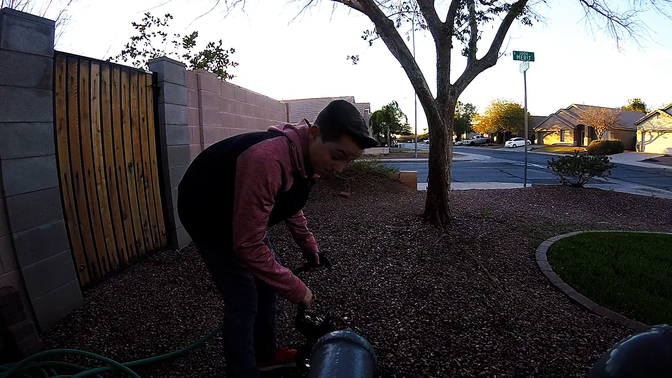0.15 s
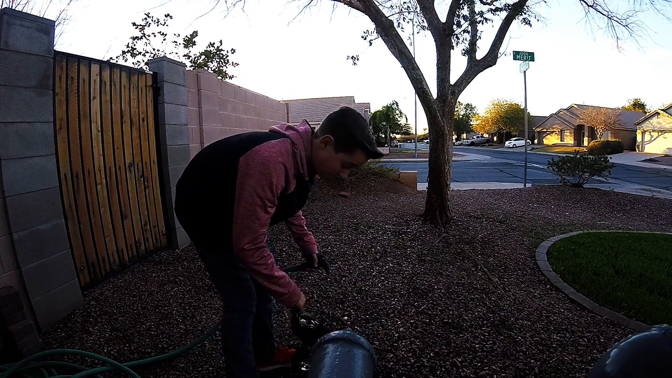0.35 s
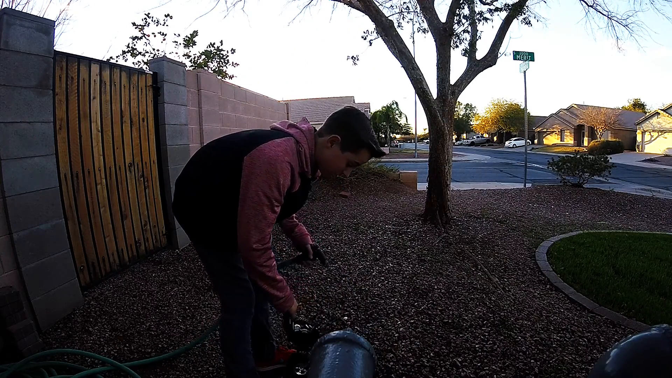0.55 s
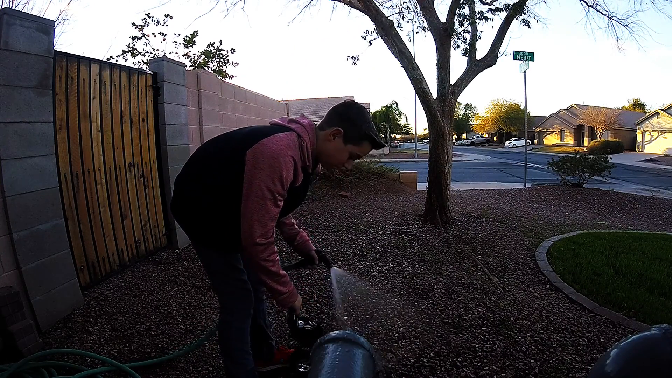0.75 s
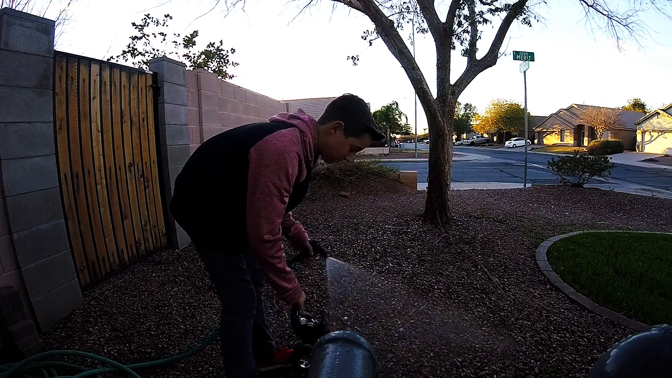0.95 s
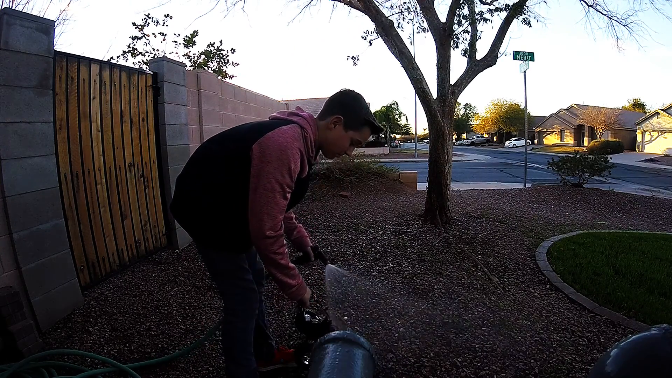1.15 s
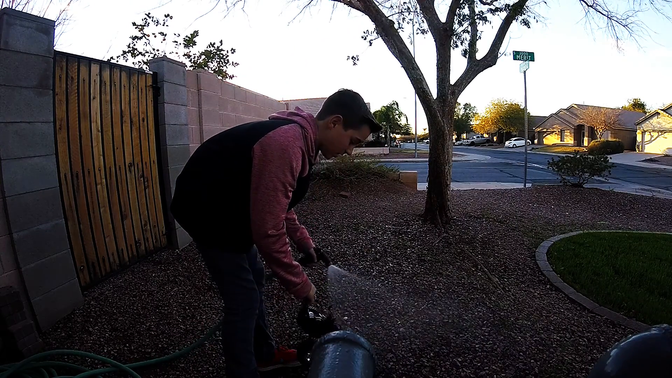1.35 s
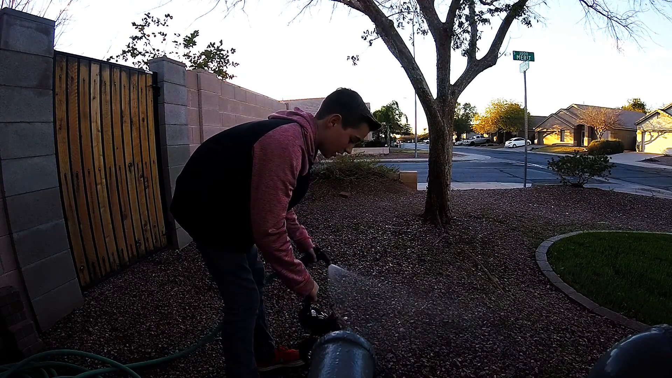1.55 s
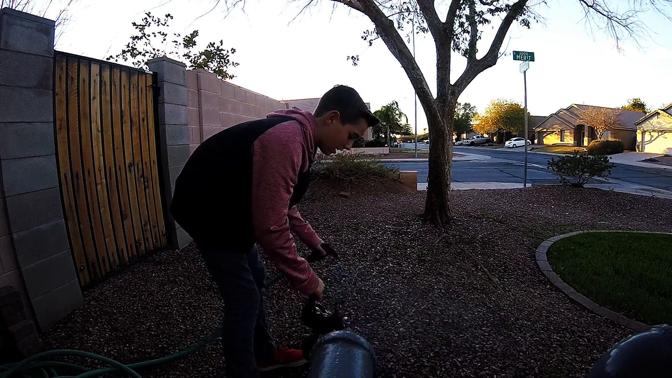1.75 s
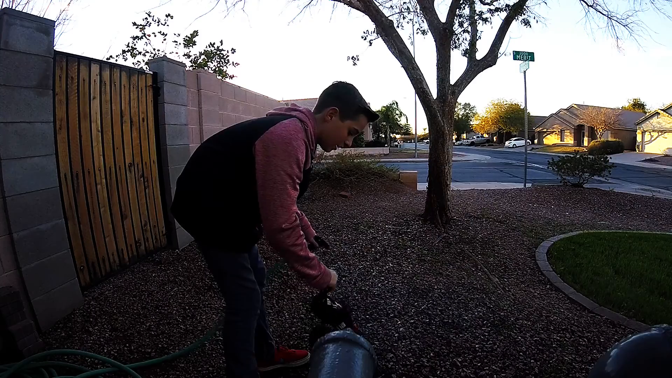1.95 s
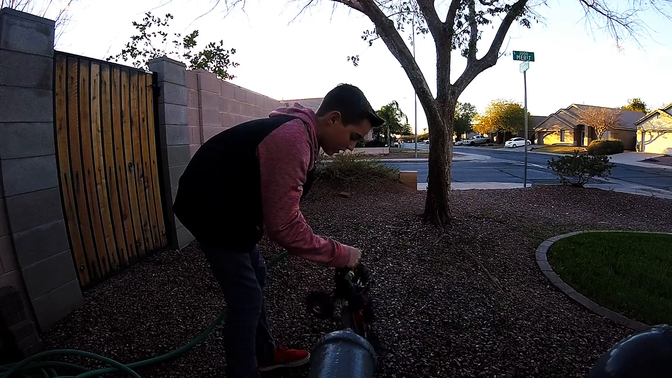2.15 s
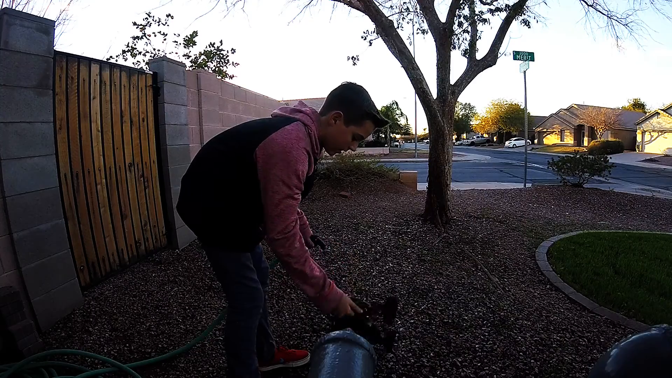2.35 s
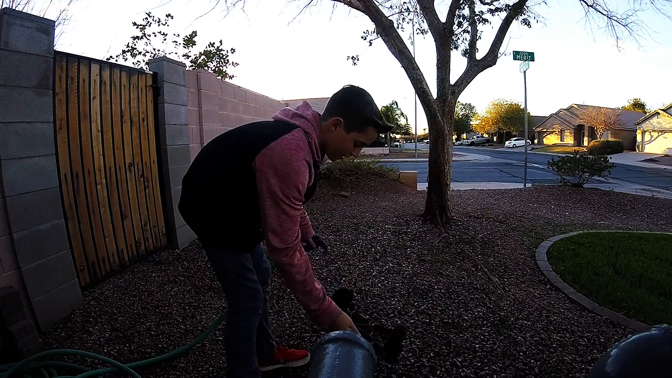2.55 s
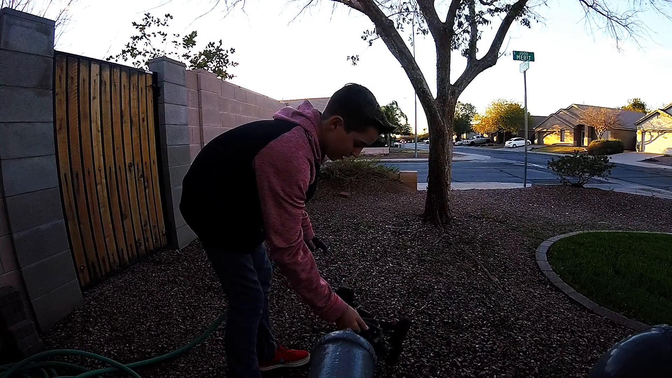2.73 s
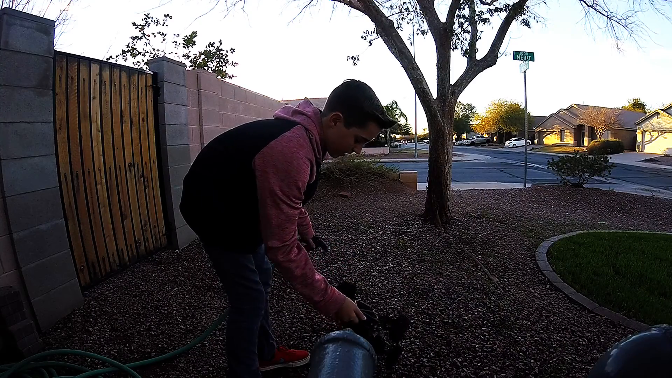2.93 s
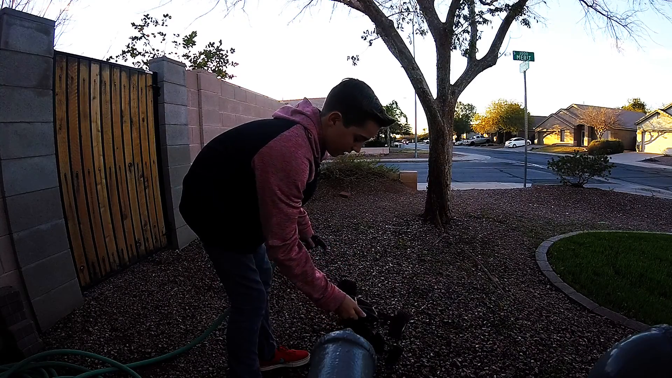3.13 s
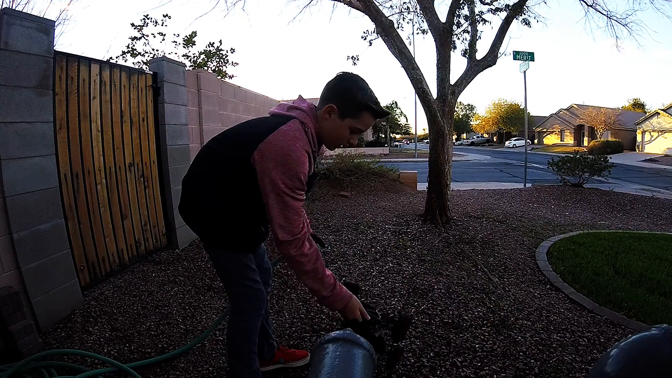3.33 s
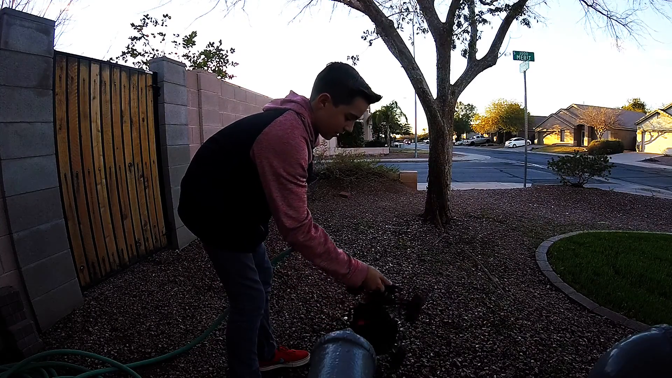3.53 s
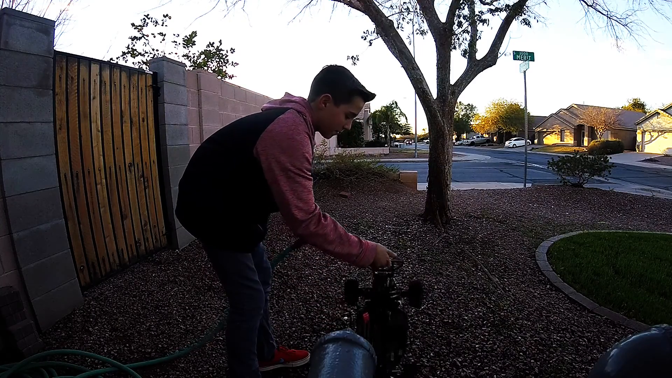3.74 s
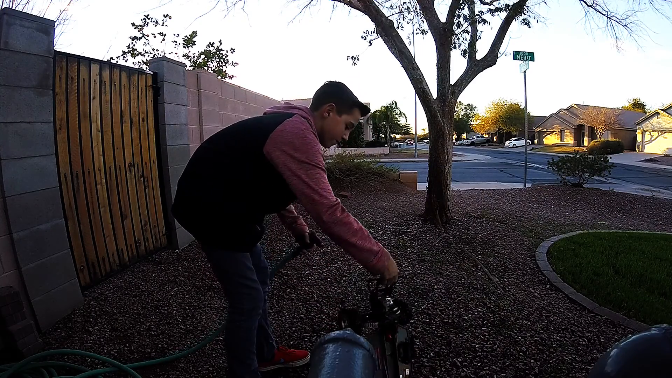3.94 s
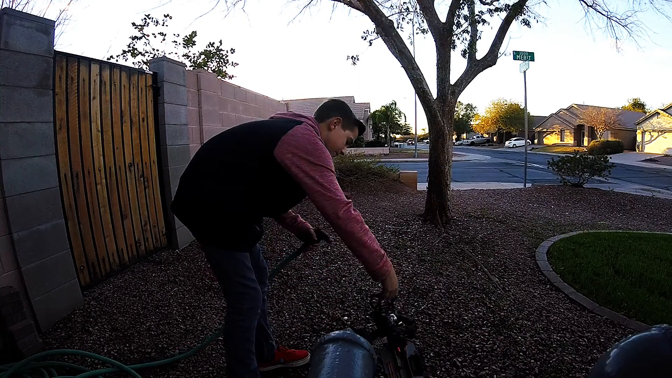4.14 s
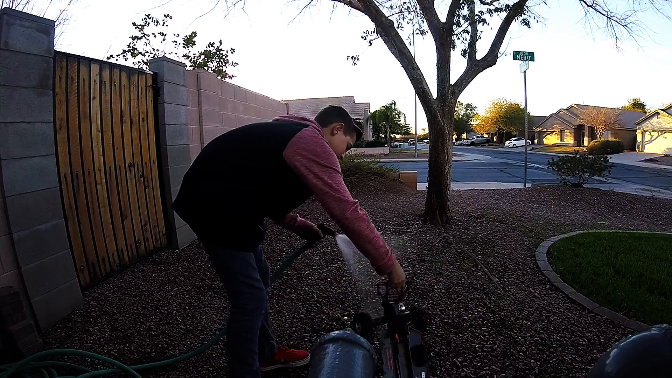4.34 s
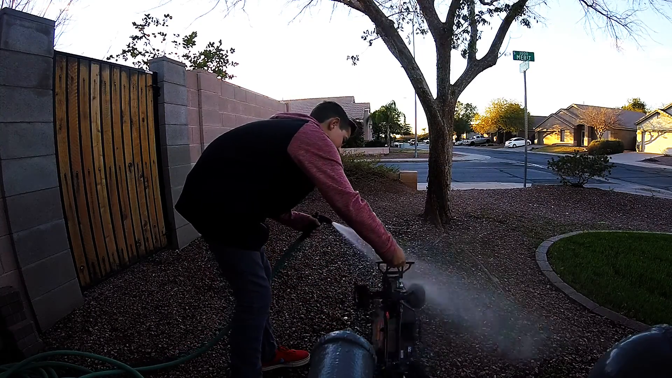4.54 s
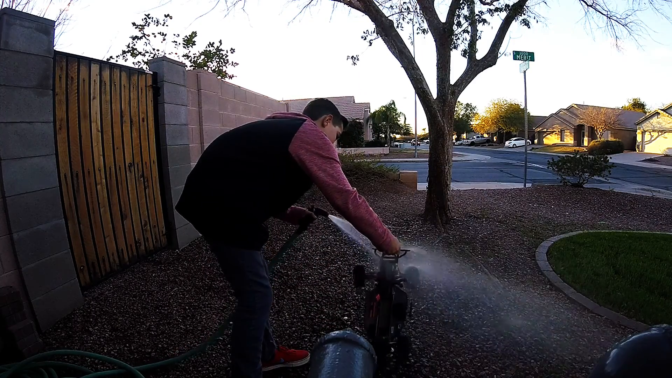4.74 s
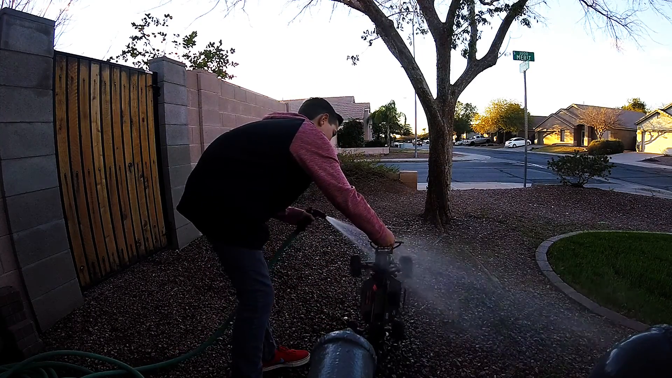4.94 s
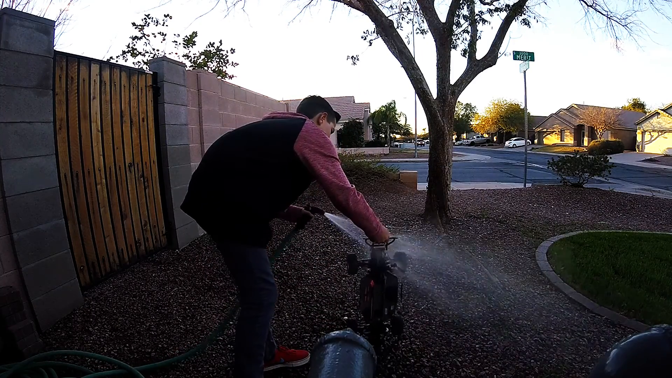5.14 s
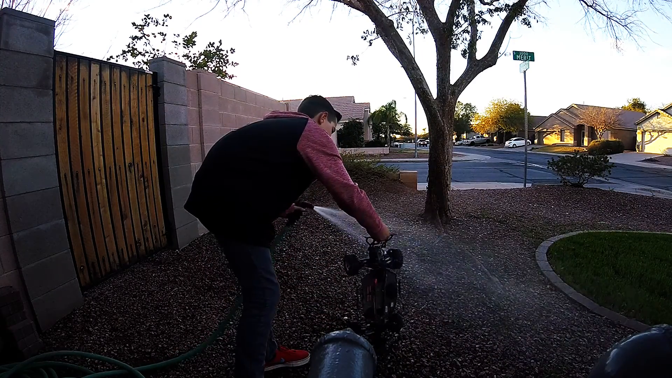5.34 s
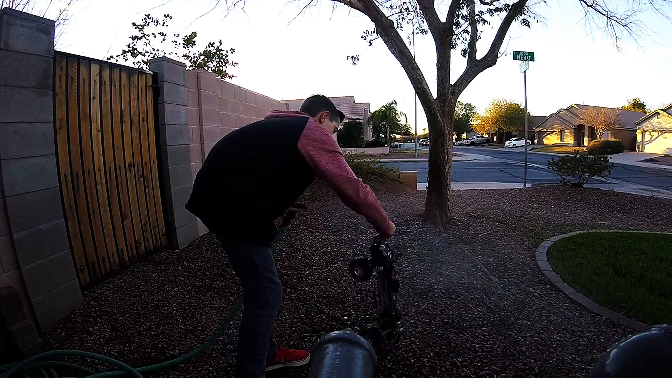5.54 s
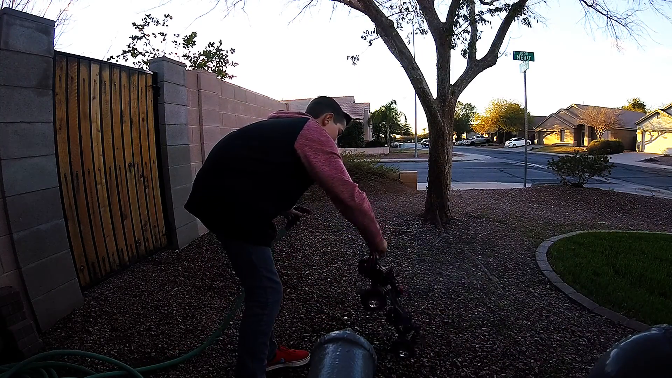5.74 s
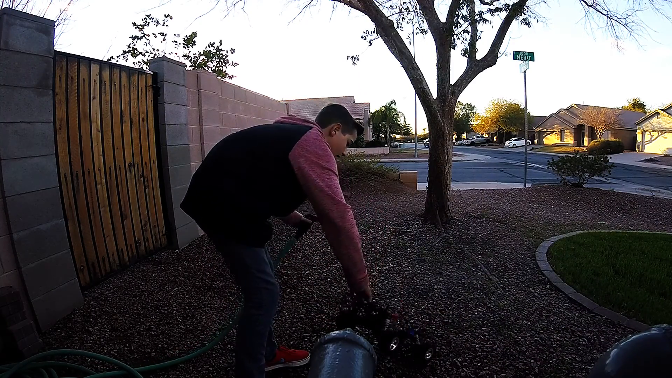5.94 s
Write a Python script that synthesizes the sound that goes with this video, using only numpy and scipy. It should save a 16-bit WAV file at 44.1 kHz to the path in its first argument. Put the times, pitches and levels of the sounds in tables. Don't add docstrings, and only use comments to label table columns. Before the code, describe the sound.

A dirt bike howls at full throttle and coasts away while a garden hose sprays gravel, then drums on a hollow plastic model car.

```python
import sys
import numpy as np
from scipy import signal
from scipy.fft import rfft, irfft, next_fast_len
from scipy.io import wavfile
from scipy.ndimage import uniform_filter1d, map_coordinates

SR = 44100
rng = np.random.default_rng(int(sys.argv[2]) if len(sys.argv) > 2 else 0)


def volts_from_decibels(level):
    exponent = np.asarray(level, float) / 20
    return 10 ** exponent


def wav_out(sig):
    wavfile.write(sys.argv[1], SR, np.round(np.clip(np.atleast_2d(sig).T, -1, 1) * 32767).astype(np.int16))


N = 268216


def unit(x):
    return x / np.sqrt(np.mean(x ** 2) + 1e-20)


def curve(rows):
    s, value = np.transpose(rows)
    return np.interp(np.arange(N) / SR, s, value)


def ramp(start, length):
    return np.clip((np.arange(N) / SR - start) / length, 0, 1)


def humps(rows):
    t = np.arange(N) / SR
    return sum(volts_from_decibels(db) * np.cos(np.pi * np.clip((t - s) / length, -.5, .5)) for s, db, length in rows)


def wobble(rate):
    knots = rng.standard_normal(int(N * rate / SR) + 4)
    return map_coordinates(knots, [np.arange(N) * rate / SR])


def filtered(x, response):
    m = next_fast_len(N + SR // 2)
    return irfft(rfft(x, m) * response(np.fft.rfftfreq(m, 1 / SR)), m)[:N]


def colour(points):
    f, db = np.transpose(points)
    return lambda hz: volts_from_decibels(np.interp(np.log(hz + 1), np.log(f + 1), db, left=-120, right=-120))


def modes(peaks):
    def response(f):
        total = 0
        for k, (centre, width, db) in enumerate(peaks):
            damping = 1j * f * width
            total = total + (-1) ** k * volts_from_decibels(db) * damping / (centre * centre - f * f + damping)
        return total
    return response


def rush(patchy_db):
    z = signal.stft(rng.standard_normal(N), nperseg=512)[2]
    field = uniform_filter1d(rng.standard_normal(z.shape), size=6, axis=0)
    field = uniform_filter1d(field, size=8, axis=1)
    return unit(signal.istft(z * volts_from_decibels(patchy_db * unit(field)), nperseg=512)[1][:N])


def drops(per_second, spread_db):
    hit = rng.random(N) < per_second / SR
    size_db = spread_db * np.minimum(rng.exponential(size=N), 2)
    return unit(hit * rng.choice([-1, 1], N) * volts_from_decibels(size_db))


def fading_tone(turns, depth, rate):
    reflections = depth * (wobble(rate) + 1j * wobble(rate))
    return np.imag((1 + reflections) * np.exp(2j * np.pi * turns))


def soft(x):
    return filtered(x, lambda hz: 1 / (1 + 1j * hz / 13000) ** 2 / (1 + (hz / 11200) ** 12))


# pitch_hz, level_db [per Hz]
ROAD_COLOUR = [(230, 11), (280, 1.5), (340, 5), (420, 3), (480, -2), (560, -8.5)]
# peak_s, peak_db, length_s
LORRIES = [
    (2.2, -48, 0.8),
    (3, -44.5, 0.91),
    (4.9, -61, 1.2),
    (6.2, -47, 2.4),
]
# start_s, end_s, first_hz, last_hz, level_db
DRONES = [(0.64, 1.46, 210, 140, -31), (1.3, 1.53, 169, 172, -31), (2.05, 2.93, 177.1, 150, -43),
          (2.8, 3.97, 140.2, 149, -42.5), (4.2, 7, 149, 140, -46), (3.95, 5.1, 150, 240, -37),
          (4.2, 4.9, 260.7, 280.5, -45.5), (4.7, 8.5, 200, 180, -37.5), (1.6, 2.8, 683, 690, -52.5),
          (2.5, 2.9, 404.6, 390, -46), (2.8, 3.3, 350, 330, -50.5), (5.4, 6.36, 690, 700, -48.5)]


def traffic():
    out = (volts_from_decibels(-52) + humps(LORRIES)) * unit(filtered(rush(1.1), colour(ROAD_COLOUR)))
    for start, end, first_hz, last_hz, db in DRONES:
        turns = np.cumsum(first_hz + (last_hz - first_hz) * ramp(start, end - start)) / SR
        swell = humps([((start + end) / 2, db, end - start)])
        out += swell * fading_tone(turns, .35 + first_hz / 900, 8 + first_hz / 14)
    return out


# pitch_hz, level_db [per Hz]
BOOM_COLOUR = [(62, -69), (105, -33), (127, -27.5), (145, 1.5), (248, -6), (273, -22), (291, -14),
               (327, -73), (420, -21.5), (550, -19), (920, -120)]
# pitch_hz, level_db [per Hz]
WASH_COLOUR = [(180, -14), (300, -2), (367, -5), (541, -12.5), (684, 0.5), (800, -3.5), (988, -1.5),
               (1180, -5.5), (1410, -0.5), (2020, -12), (2280, -12), (2460, -13.5), (4300, -27.5),
               (5590, -62), (9460, -120)]
# peak_s, peak_db, length_s
CROSSING_CARS = [
    (2.25, -45.5, 1.6),
    (3.2, -58, 0.17),
    (6.2, -40, 1.27),
]


def street_air():
    bike_near = volts_from_decibels(-20 * np.maximum(np.arange(N) / SR - 0.83, 0) / 0.98)
    boom = unit(filtered(rush(1.0), colour(BOOM_COLOUR)))
    wash = unit(filtered(rush(1.4), colour(WASH_COLOUR)))
    boom_gain = np.hypot(volts_from_decibels(-36.5 + .9 * wobble(2.5)), volts_from_decibels(-35.5) * bike_near)
    wash_gain = np.hypot(volts_from_decibels(-42 + 0.21 * wobble(3.0)), volts_from_decibels(-39.5) * bike_near + humps(CROSSING_CARS))
    return boom_gain * boom + wash_gain * wash


# pitch_hz, level_db [per Hz]
BUFFET_COLOUR = [(12, -30), (20, -14), (75, -7), (115, -8.5), (150, 7.5), (250, -120)]
# peak_s, peak_db, length_s
GUSTS = [
    (.15, -35, 0.65),
    (1.3, -54, 2),
    (4.1, -56, 0.86),
    (4.85, -41, 0.96),
    (5.6, -45.5, 1.3),
]


def wind():
    buffet = unit(volts_from_decibels(0.9 * wobble(5.8)) * filtered(rush(0.17), colour(BUFFET_COLOUR)))
    calm, gust = volts_from_decibels(-59), humps(GUSTS)
    return (calm + gust ** 2 / (gust + calm)) * buffet


# pitch_hz, level_db [per Hz]
LEAK_COLOUR = [(2240, -18), (3800, -8.5), (4120, -11.5), (4780, -2), (5490, 4), (5890, 3.5), (6680, -1),
               (7240, 2.5), (7500, 0), (8910, -4.5), (10500, 0), (11600, -11.5), (15400, -14.5)]
# pitch_hz, width_hz, level_db
LEAK_TONES = [(6540, 41, 13), (6830, 34, 4), (7780, 170, 4.5), (9030, 110, 3), (9850, 47, 7),
              (10300, 31, -11)]
# time_s, level_db
NOZZLE = [
    (0, -44),
    (1.6, -47.5),
    (1.78, -47.5),
    (3.1, -47),
    (3.8, -44.5),
    (4.4, -47),
    (5.5, -47),
    (5.56, -52.5),
    (6.08, -47.5),
]


def nozzle_leak():
    hiss = unit(filtered(rush(1.7) + 0.6 * drops(900, 3.5), colour(LEAK_COLOUR)))
    whistle = unit(filtered(rush(3.5), modes(LEAK_TONES)))
    return volts_from_decibels(curve(NOZZLE) + 0.62 * wobble(13)) * (hiss + 0.51 * whistle)


# start_s, peak_db, pitch_hz
TICKS = [(1.834, -22.5, 10300), (2.0209, -23, 5900), (2.165, -22, 5207), (2.3237, -22, 5050),
         (2.451, -23, 6490), (2.4632, -22, 5155), (2.48, -18, 5750), (2.5064, -17, 5500),
         (2.517, -17, 5400), (2.524, -18, 5600), (2.577, -25, 5470), (2.5965, -31, 4940),
         (2.617, -19, 5640), (2.6371, -20, 5520), (2.6643, -22, 5400), (2.781, -22.5, 7780),
         (2.837, -21, 6400), (3.0233, -33, 5260), (3.068, -31, 6500), (3.0971, -28, 5320),
         (3.1115, -12.5, 5350), (3.113, -19, 4040), (3.12, -19, 5460), (3.15, -31, 5200),
         (3.471, -15, 6640), (3.5047, -24, 6830), (3.5503, -22, 5330), (3.556, -23, 5300),
         (3.6346, -16.5, 5560), (3.66, -21, 5470), (3.682, -20, 6040), (3.62, -25, 5340), (3.72, -28, 6300),
         (3.738, -21, 5870), (3.7477, -16, 6000), (3.76, -24, 5600), (3.768, -21, 5400),
         (4.109, -21.5, 5600), (4.4035, -15, 5660), (4.6234, -29, 5100), (4.6558, -18, 5450),
         (4.7411, -18, 5100), (4.755, -14, 5070), (4.8324, -26, 5270), (4.859, -14, 5300),
         (4.867, -12, 5270), (4.9401, -22, 5400), (4.965, -16, 5500), (4.998, -25, 5000),
         (5.029, -22, 5600), (5.053, -11, 5000), (5.06, -13, 4850), (5.064, -14, 5530), (5.075, -21, 4820),
         (5.27, -21, 5160), (5.503, -17, 5060), (5.41, -28, 5400), (5.467, -25, 6540), (5.707, -34, 5000),
         (5.7335, -25.5, 8000), (5.998, -23, 5190), (6.0493, -25, 5160),
         (2.212, -28, 7300),
    (2.2304, -24, 5000),
    (2.3096, -27, 3020),
    (5.5446, -27, 5390),
    (5.6461, -35, 7090),
    (5.7594, -31, 5530),
    (5.983, -31, 3020),
    (6.0137, -25.5, 5800),
    (6.0703, -24, 5190),
]


def ticks():
    crack, ring = np.zeros(N + SR), np.zeros(N + SR)
    t = np.arange(SR // 50) / SR
    for s, db, hz in TICKS:
        i = round(s * SR)
        crack[i:][:len(t)] += volts_from_decibels(db - 8.5 - 60 * t / 0.022) * rng.standard_normal(len(t))
        onset = 1 - np.exp(-t / 0.00012)
        ring[i:][:len(t)] += volts_from_decibels(db - 11.5 - 60 * t / 0.018) * onset * np.sin(2 * np.pi * hz * t)
    crack_colour = lambda hz: colour(LEAK_COLOUR)(hz) / (1 + (hz / 11500) ** 8)
    return filtered(crack[:N], crack_colour) + ring[:N]


def contacts(rows):
    force, clack, hollow = np.zeros(N + SR), np.zeros(N + SR), np.zeros(N + SR)
    clack_hz, hollow_hz, pitch_spread = 1740, 928, 0.054
    t = np.arange(SR // 20) / SR
    ring = volts_from_decibels(8.5 - 60 * t / 0.023) * (1 - np.exp(-t / 0.0025))
    for s, db, hollow_db in rows:
        i = round(s * SR)
        burst = volts_from_decibels(-60 * t / 0.015) * (1 - np.exp(-t / 0.0016)) * rng.standard_normal(len(t))
        burst[0] = 1.6
        high, low = 1 + pitch_spread * rng.uniform(-1.25, 1, size=2)
        force[i:][:len(t)] += volts_from_decibels(db + 25) * burst
        clack[i:][:len(t)] += volts_from_decibels(db) * ring * np.sin(2 * np.pi * clack_hz * high * t)
        hollow[i:][:len(t)] += volts_from_decibels(hollow_db) * ring * np.sin(2 * np.pi * hollow_hz * low * t)
    return force[:N], clack[:N], hollow[:N]


# peak_s, level_db, build_up_s
SCRAPES = [
    (2.53, -43, 0.082),
    (2.645, -43.5, 0.088),
    (2.74, -44.5, 0.36),
    (3.032, -47, 0.028),
    (3.111, -40, 0.024),
    (3.44, -50, 0.067),
    (3.55, -48.5, 0.11),
    (3.632, -39, 0.077),
    (3.68, -44, 0.24),
]
# pitch_hz, width_hz, level_db
CHASSIS = [(897, 63, 7), (1753, 110, 5), (1910, 75, -0.5), (2385, 86, -0.5), (3500, 630, -23),
           (5140, 230, -3.5), (5400, 210, -18), (6340, 240, -12), (7400, 720, -28)]
# start_s, clack_db, hollow_db
KNOCKS = [(2.445, -42, -48), (2.4631, -35, -37), (2.48, -36, -29), (2.5069, -33, -28), (2.514, -40, -36),
          (2.52, -34, -33), (2.5248, -43, -30), (2.6144, -38, -46), (2.622, -28.5, -28), (2.637, -34, -44),
          (2.647, -49, -43), (2.6633, -31.5, -37), (2.682, -35, -42), (2.696, -55, -40), (2.711, -35, -40),
          (2.718, -34, -34), (2.738, -53, -35), (3.0232, -37.5, -46), (3.097, -39, -40),
          (3.104, -37.5, -37), (3.1121, -48, -23.5), (3.1512, -45, -43), (3.39, -43, -55),
          (3.435, -38, -42), (3.5352, -39, -34), (3.579, -41, -52), (3.599, -53, -34), (3.611, -34, -48),
          (3.617, -42, -46), (3.6214, -33, -44), (3.6322, -30.5, -34), (3.64, -32, -41),
          (3.6612, -35.5, -42), (3.673, -40, -32), (3.682, -48, -48)]
# start_s, panel_db, hollow_db
SLAPS = [(4.4598, -30, -32), (4.5477, -33, -48), (4.649, -30, -55), (4.687, -30.5, -29),
         (4.719, -28.5, -23), (4.8335, -23, -22), (4.8669, -29.5, -23), (4.8749, -26, -40),
         (4.896, -29, -20.5), (4.965, -27, -40), (4.998, -34, -33), (5.01, -34, -33), (5.052, -34, -37),
         (5.061, -40, -41), (5.075, -35, -36), (5.2457, -34, -30), (5.27, -34, -42)]


def scrapes():
    grit = 0.66 * rush(3.0) + 0.59 * drops(900, 1.7)
    body = unit(filtered(grit, modes(CHASSIS)))
    hiss = 0.62 * unit(filtered(grit, colour(JET_COLOUR)))
    crunch = 0.22 * unit(filtered(grit, colour(SPLASH_COLOUR)))
    drags = []
    for s, db, rise in SCRAPES:
        build = volts_from_decibels(db - 21 * (1 - ramp(s - rise, rise))) * ramp(s - rise, rise / 10)
        drags.append(build * (1 - ramp(s, 0.035)) ** 2)
    jolts = volts_from_decibels(2 * wobble(60))
    return volts_from_decibels(4.5) * np.max(drags, axis=0) * (body + hiss + crunch) * jolts


def car():
    force, clack, hollow = contacts(KNOCKS)
    slap, _, drum = contacts(SLAPS)
    impact = force + slap
    rasp = volts_from_decibels(-9.5) * filtered(impact, colour(SPLASH_COLOUR)) + volts_from_decibels(-24) * filtered(impact, colour(LEAK_COLOUR))
    knock = filtered(force, modes(CHASSIS[2:])) + clack + hollow
    slapped = volts_from_decibels(-1) * filtered(slap, modes(SHELL[1:])) + drum
    return volts_from_decibels(1.0) * soft(scrapes() + rasp + knock + slapped)


# open_s, shut_s, jet_db, surge_db, splash_db [over the jet]
SPRAYS = [
    (0.765, 1.74, -37, 6.5, -3),
    (4.393, 5.518, -42, 6, -1),
]
# start_s, end_s, first_db, last_db, shell_db [share on the shell]
SWEEPS = [(4.451, 4.507, -30, -29.5, -7), (4.497, 4.724, -32, -29.5, -7.5), (4.72, 4.763, -29, -36, -1.5),
          (4.747, 4.84, -30, -31.5, -5), (4.804, 4.856, -35.5, -31, 3), (4.853, 4.916, -29, -33, 3),
          (4.908, 5.026, -36.5, -29.5, 1.5), (4.995, 5.085, -35, -31, 4.5), (5.074, 5.099, -29, -34, -1),
          (5.087, 5.16, -39, -38, -11), (5.14, 5.29, -36.5, -33, -2), (5.28, 5.303, -33, -34.5, -5.5)]


def spray_flow():
    open_s, shut_s, spurt_s, edge_s = 0.015, 0.011, 0.19, 0.039
    jet = ground = shell = 0
    for start, end, db, surge_db, splash_db in SPRAYS:
        flow = volts_from_decibels(db + surge_db * (1 - ramp(start + 0.21, 0.33)))
        dribble = volts_from_decibels(-8) * (1 - ramp(end, 0.086))
        flow *= np.maximum(1 - ramp(end, shut_s), dribble)
        spurt_db = 1.5 * ramp(end - spurt_s, spurt_s)
        jet = jet + flow * volts_from_decibels(spurt_db) * ramp(start, open_s)
        ground = ground + flow * volts_from_decibels(splash_db - spurt_db) * ramp(start + 0.021, open_s)
    for start, end, first_db, last_db, shell_db in SWEEPS:
        hit = volts_from_decibels(first_db + (last_db - first_db) * ramp(start, end - start))
        hit = hit * ramp(start - edge_s / 2, edge_s) * (1 - ramp(end - edge_s / 2, edge_s))
        jet = np.maximum(jet, hit)
        shell = np.maximum(shell, volts_from_decibels(shell_db) * hit)
    return jet, ground, shell


# pitch_hz, level_db [per Hz]
JET_COLOUR = [(2060, -15), (3500, -13), (4310, -17), (4930, 5.5), (5670, 7.5), (6140, 3), (7060, -1.5),
              (10400, -5.5), (10800, -8), (11800, -21), (12600, -21), (13700, -16), (14300, -24),
              (15400, -34)]
# pitch_hz, level_db [per Hz]
SPLASH_COLOUR = [(440, -6), (750, 1), (858, -7), (1070, 1.5), (1180, -1.5), (1800, -0.5), (3280, -4.5),
                 (3790, -6.5), (4500, -5), (5850, -39), (9900, -120)]
# pitch_hz, width_hz, level_db
DROPLETS = [(4800, 120, 2.5), (5430, 1500, -4), (5680, 160, 2.5)]
# pitch_hz, width_hz, level_db
SHELL = [(824, 81, -1), (1600, 150, 1), (2254, 150, 3.5), (2630, 150, 2), (3160, 290, -2.5),
         (4120, 210, -4.5)]


def hose():
    hiss = unit(filtered(rush(1.0) + 0.85 * drops(1700, 3.6), colour(JET_COLOUR)))
    crackle = unit(soft(filtered(drops(350, 3.8), modes(DROPLETS))))
    jet = unit(hiss + .5 * crackle)
    splash = unit(filtered(rush(1.7) + 0.52 * drops(1200, 6.5), colour(SPLASH_COLOUR)))
    pelting = rush(2.9) + 1.0 * drops(1100, 2.3)
    hollow = unit(filtered(filtered(pelting, modes(SHELL[:1])), modes([(860, 1700, 0)])))
    panels = unit(filtered(pelting, modes(SHELL[1:])))
    pings = unit(filtered(drops(360, 1.8), modes(DROPLETS)))
    jet_gain, ground, shell = spray_flow()
    drumming = 1.05 * pings + 0.9 * panels + volts_from_decibels(-6 + 1.1 * wobble(24.95)) * hollow
    wet = np.hypot(ground, 0.36 * shell) * splash + shell * drumming
    return volts_from_decibels(0.13 * wobble(23)) * (jet_gain * jet + soft(wet))


# peak_s, peak_db, length_s
SWELLS = [
    [(.022, -7.5, 0.056)],
    [(.09, -7.5, 0.068), (.15, -10.5, 0.095), (.205, -10, 0.15)],
    [(.275, -14, 0.029), (.34, -8.5, 0.13), (.41, -7.5, 0.064), (.465, -7, 0.1)],
    [(.567, -10, 0.087)],
    [(.641, -8, 0.068)],
    [(.696, -8.5, 0.057)],
    [(.743, -14.5, 0.043)],
    [(.78, -13.5, 0.0478), (.812, -10, 0.052)],
    [(.876, -9, 0.087)],
    [(.968, -14.5, 0.086)],
    [(1.06, -22.5, 0.11)],
    [(1.142, -24, 0.061)],
    [(1.205, -21.5, 0.042)],
]
# time_s, pitch_hz
HEARD_PITCH = [(.02, 173), (.1, 185.4), (.4, 194.2), (.6, 186.5), (.8, 172.1), (.97, 162.4), (1.22, 162)]
# multiple, peak_db
ECHOED = [(2, -36), (3, -46.5)]


def exhaust_note():
    swell = sum((-1) ** k * humps(group) for k, group in enumerate(SWELLS))
    turns = np.cumsum(curve(HEARD_PITCH)) / SR
    note = swell * np.sin(2 * np.pi * turns)
    for k, db in ECHOED:
        note = note + humps([(0.923, db, 0.55)]) * fading_tone(k * turns, 0.52, 17.7)
    return note


# time_s, firing_hz, overtone_db
ENGINE = [
    (-.16, 166, -28),
    (0, 186.7, -25),
    (0.423, 196.5, -25.5),
    (0.528, 190, -26.5),
    (0.759, 171.7, -28.5),
    (1.05, 147.1, -30),
    (1.5, 114.1, -31),
    (2.099, 85.67, -37.5),
    (2.4, 80, -36.5),
    (2.7, 72.5, -38),
]
# multiple, level_db
ORDERS = [(2, 3), (3, -0.5), (4, -4), (5, -6.5), (6, -2), (7, -3), (8, -28), (9, -2.5), (10, -3.5),
          (11, -3.5), (12, -8), (13, -34), (14, -10.5), (16, -12)]
# pitch_hz, level_db
PIPE_COLOUR = [(120, -24), (170, 14), (260, -9.5), (400, -5.5), (600, -9.5), (1000, -11.5), (2200, -21),
               (4800, -7)]


def exhaust_overtones():
    s, hz, tone_db = np.transpose(ENGINE)
    t, tones = np.arange(N) / SR, 0
    closing = np.clip((t - .5) / .3, 0, 1)
    for delay_s, path_db in [(0, -0.5), (.15, -4.5)]:
        echo = delay_s > 0
        turns = np.cumsum(np.interp(t - delay_s, s, hz) * (1 + 0.0023 * wobble(25.66))) / SR
        level = volts_from_decibels(path_db - 8 * closing * echo + np.interp(t - delay_s, s, tone_db, right=-120))
        for k, db in ORDERS:
            order_gain = volts_from_decibels(db - 9 * closing + (2 * closing - 3 * echo) * (k > 5))
            tone = fading_tone(k * turns, .2 + .02 * k + .32 * closing, 11 + 1.5 * k)
            tones = tones + level * order_gain * tone
    return filtered(tones, colour(PIPE_COLOUR)), turns


# pitch_hz, level_db [per Hz]
ROAR_COLOUR = [(205, -2), (235, 2), (270, 4), (330, -4), (420, -13.5), (520, -16), (700, -50)]
# pitch_hz, level_db [per Hz]
CLATTER_COLOUR = [(450, -57), (900, -11), (1900, -7.5), (3000, -12), (4300, -7.5), (4800, -2.5), (5500, -7),
                  (7500, -18.5), (10500, -46)]
# peak_s, peak_db, length_s
CLATTER_SWELLS = [
    (.1, -41.5, 0.6),
    (.36, -42, 0.26),
]


def bike():
    s, _, tone_db = np.transpose(ENGINE)
    t = np.arange(N) / SR
    overtones, turns = exhaust_overtones()
    gate = 1 + .5 * np.cos(2 * np.pi * turns)
    roar = unit(filtered(gate * rush(1.5), colour(ROAR_COLOUR)))
    clatter = unit(filtered(gate * rush(0.33), colour(CLATTER_COLOUR)))
    roar_gain = volts_from_decibels(-25 - 151 * np.maximum(t - 0.5, 0))
    clatter_gain = np.hypot(volts_from_decibels(np.interp(t, s, tone_db) - 18.5), humps(CLATTER_SWELLS))
    return exhaust_note() + overtones + roar_gain * roar + clatter_gain * clatter


def scene():
    background = traffic() + street_air() + wind() + nozzle_leak()
    return (background + ticks() + car() + hose() + bike())[None]


def top_cut(x):
    return signal.sosfilt(signal.butter(12, 15330, fs=SR, output="sos"), x)


def record(dry):
    def housing(hz):
        notch = 1 - .4 / (1 + ((hz - 4150) / 200) ** 2)
        return notch / (1 + (hz / 15300) ** 24)
    mix = filtered(dry[0], housing)[None]
    return top_cut(mix)


dry = scene()
out = record(dry)
wav_out(out)
```